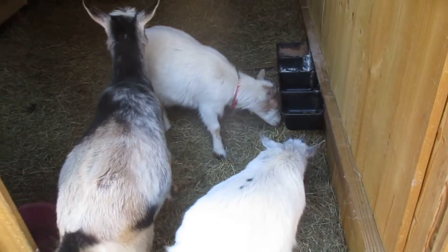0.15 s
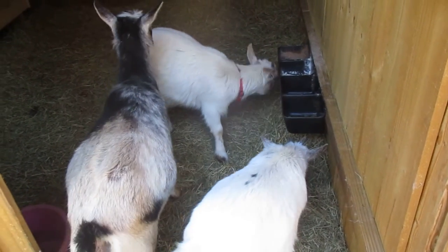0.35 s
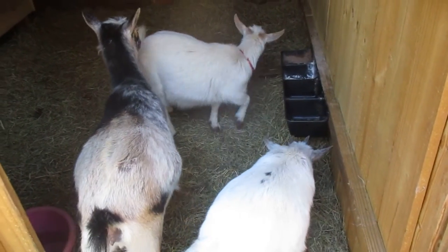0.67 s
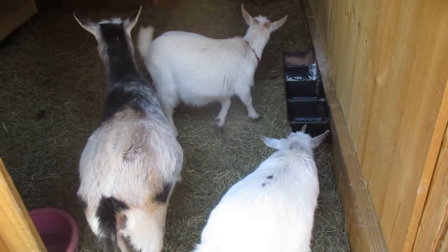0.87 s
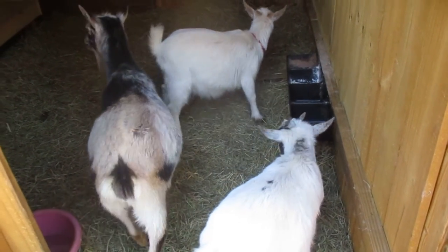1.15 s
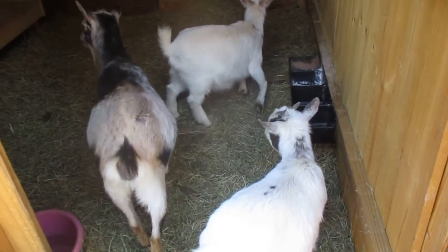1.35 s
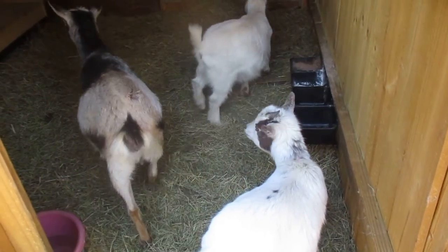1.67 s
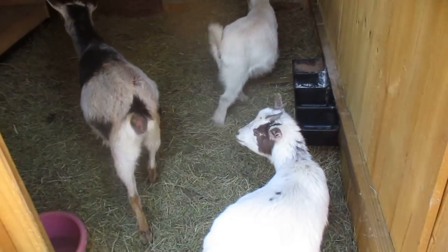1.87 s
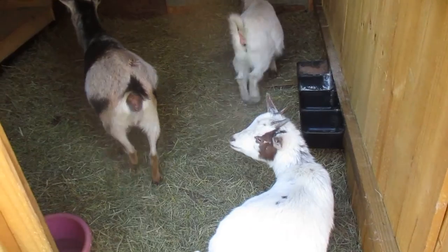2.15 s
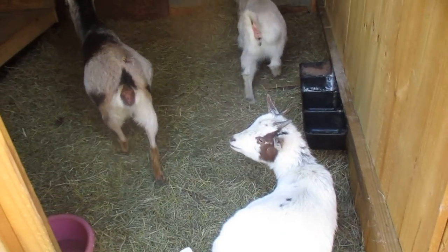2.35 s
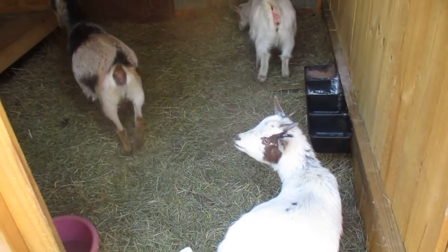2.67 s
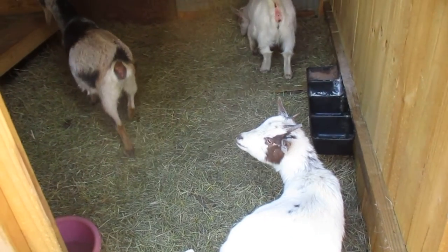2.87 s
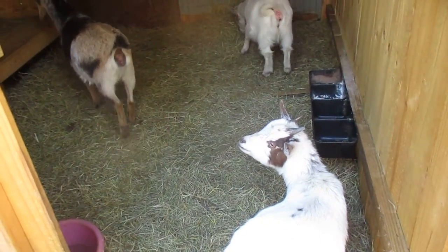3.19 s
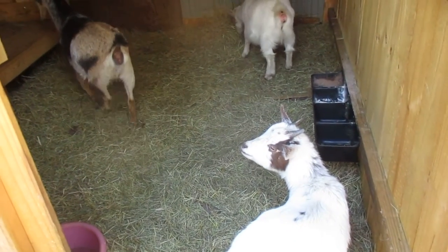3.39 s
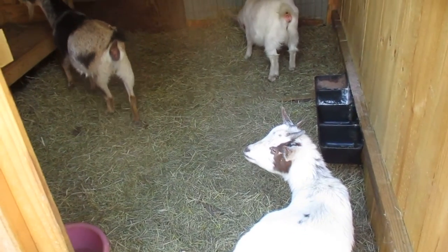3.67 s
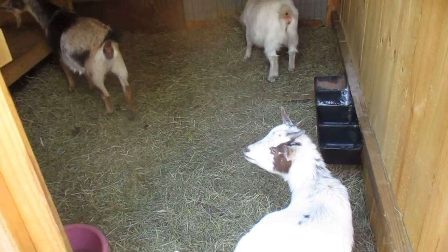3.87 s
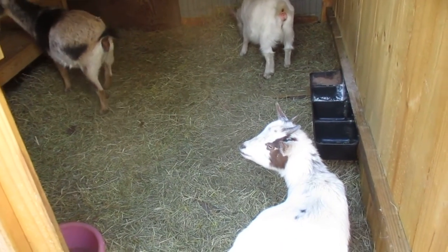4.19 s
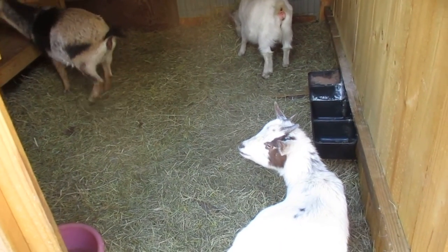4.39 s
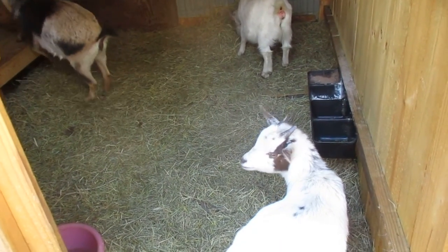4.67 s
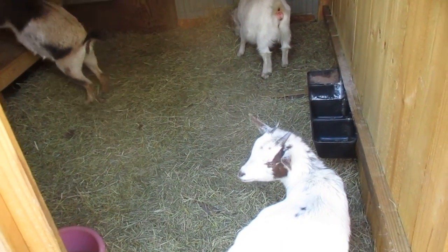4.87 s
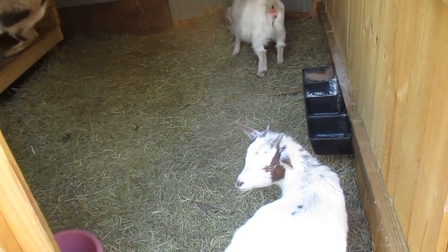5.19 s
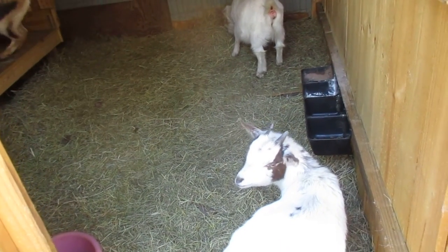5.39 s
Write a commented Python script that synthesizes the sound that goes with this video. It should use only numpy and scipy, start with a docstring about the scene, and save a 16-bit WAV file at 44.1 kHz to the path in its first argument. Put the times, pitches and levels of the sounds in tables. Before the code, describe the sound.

Inside a small wooden pen, a nearby goat gives a short throbbing bleat over rustling straw. Low air puffs bump the microphone, soft dull hoof thuds follow, and a fainter goat answers from further off. Near the end a loud sharp knock on boards starts a clattering cluster, with a hoarse crowing far away. Handheld camera sound, slightly ducking after loud hits.

```python
"""In a wooden pen a goat bleats close by in throbs, about ten a second; a fainter one answers from further off.
Throats are pulse trains and hiss in resonances; hooves are noise bursts and jolts ringing boards.
Straw rustles and snaps as noise grains, air puffs on the microphone, and a far hoarse crowing swells late.
Under it lie the barn's hush, a wavering band near 1 kHz, a faint whistle and the camera's thin whine.
The camera's gain control ducks after loud sounds and creeps back."""
import sys
import numpy as np
from scipy import signal
from scipy.fft import rfft, irfft, next_fast_len
from scipy.io import wavfile
from scipy.ndimage import uniform_filter1d, map_coordinates

SR = 44100
rng = np.random.default_rng(int(sys.argv[2]) if len(sys.argv) > 2 else 0)


def gain_from_db(level_db):
    """Turn a decibel level (scalar or array-like) into a linear amplitude factor."""
    decades = np.asarray(level_db, float) / 20
    return 10 ** decades


def unload_wav(signal):
    """Save mono or channel-first audio to the path in sys.argv[1] as 16-bit WAV at rate SR, clipped to [-1, 1]."""
    wavfile.write(
        sys.argv[1],
        SR,
        np.round(np.clip(np.atleast_2d(signal).T, -1, 1) * 32767).astype(np.int16),
    )


N = 244511
T = np.arange(N) / SR  # time of each sample [s]

# throbs of each voice: (time of peak [s], relative level [dB], pitch [Hz], length [s], mouth opening [0-1])
NEAR_THROBS = [(.645, -24, 316.2, 0.04, 0.33), (.75, -21, 455.4, 0.048, 0.73),
               (.84, -20.5, 517.2, 0.045, 0.84), (.931, -22.5, 538.3, .048, 0.89),
               (1.018, -23.5, 517, 0.044, 0.77), (1.111, -24.5, 515, .056, 0.71),
               (1.203, -32.5, 447.7, 0.046, 0.48), (1.268, -41.5, 385.2, 0.055, 0.82),
               (1.315, -42.5, 320, 0.032, 0.77)]
FAR_THROBS = [(3.335, -40, 435.6, 0.027, 0.041), (3.433, -39, 493, 0.018, .32),
              (3.531, -37, 519.7, 0.028, 0.58), (3.626, -40.5, 540, .035, .55),
              (3.712, -42.5, 557.6, .038, 0.53), (3.812, -44.5, 543, 0.092, 0.37)]
# throat resonances, each passed twice: (centre [Hz], width in one pass [Hz], level in one pass [dB])
NEAR_OPEN_MOUTH = [(477, 1080, -1.5), (890, 434, 4), (1622, 300, 3.5), (3150, 560, 1), (4650, 1100, -1.5)]
FAR_OPEN_MOUTH = [(517, 750, 3.2), (1000, 940, 3.5), (1580, 370, 5.2), (3570, 520, 4.8), (5100, 510, 5.5)]
SHUT_MOUTH = [(320, 152, 6.5), (926, 280, 3), (1500, 380, 2.5), (3160, 250, -9)]
CROWING_THROAT = [(694, 580, -2.5), (1184, 184, 1), (1464, 256, .5), (1990, 41, -5), (4900, 730, -12)]
# hooves on boards: (time [s], level of the first 30 ms of the plank sound [dB rms],
# boom over plank [dB], box over plank [dB], hardness [Hz])
KNOCKS = [(1.014, -47, 4, 7, 300), (2.293, -41.5, -2.5, -1.5, 1140), (2.467, -43, 15.5, 6, 490),
          (2.488, -50.5, 11.5, -1, 300), (2.577, -45, -19, -6, 794), (2.698, -56.5, 9.5, 9, 395),
          (2.717, -58, 8, 3, 350), (4.616, -49, -27, -16, 900), (4.652, -11, 0, -3, 2140),
          (4.682, -37, 15.5, 9.5, 2480), (4.983, -26, -2.5, -7, 3150), (5.038, -29, 0.5, -1, 1200),
          (5.057, -27.5, -4, 2, 1500), (5.068, -14, -2.5, 2.5, 2290), (5.227, -18.5, -3, 1.5, 2340),
          (5.246, -20.5, -10, 5.5, 1500), (5.299, -16, -2, 2, 1164)]
# what the boards ring with: (centre [Hz], width [Hz], level [dB])
BOOM_MODES = [(180.6, 19.4, 0)]
BOX_MODES = [(325, 40, 0), (470, 60, -2)]
PLANK_MODES = [(600, 120, -5), (720, 120, -5), (830, 100, -2), (920, 100, -1), (1060, 140, -5),
               (1290, 180, -8), (1520, 180, -9), (1850, 250, -13), (2320, 300, -13), (2650, 350, -14),
               (3600, 600, -17), (4500, 700, -19)]  # before the unevenness of each spot
# hooves shuffling in the bedding, before flutter: (time [s], level [dB])
SHUFFLE = [(0, -55), (.3, -77), (.65, -48.5), (.7, -54), (.93, -47), (1.1, -57.5), (1.43, -51.5),
           (1.6, -55.5), (2.2, -55), (2.45, -56.5), (2.6, -52), (3.3, -55.5), (3.5, -50.5), (3.8, -58.5),
           (4.0, -49), (4.33, -57.5), (4.49, -47.5), (4.65, -57), (5.54, -46)]
# footfalls in the straw: (time [s], level [dB], hold [s])
STEPS = [(.036, -43.5, 0.097), (.248, -57, .002), (.64, -52, 0.0073), (1.144, -46.5, 0.016),
         (1.584, -53, 0.035), (1.722, -42.5, 0.013), (1.79, -54, 0.04), (1.928, -65, .01),
         (2.006, -54.5, 0.053), (2.146, -53.5, 0.065), (2.27, -51.5, 0.033), (2.43, -61, .002),
         (2.47, -48.5, .02), (2.77, -49, .03), (2.81, -39, 0.0022), (3.03, -53, 0.051),
         (3.25, -53.5, 0.026), (3.385, -46, 0.062), (3.64, -45.5, 0.024), (4.015, -43, 0.023),
         (4.59, -47.5, 0.016), (4.988, -46, .004), (5.06, -44, 0.044), (5.238, -44, 0.0058),
         (5.4, -62, 0.036), (5.49, -56, .05)]
# colour of the rustle: (frequency [Hz], relative density [dB per Hz])
RUSTLE_COLOUR = [(880, -7), (1500, -7.5), (2200, -8), (2600, -2), (2950, -3), (3770, -3), (5270, -4),
                 (9310, -7), (15700, -15.5)]
# stalks snapping: (time [s], peak level [dB], centre [Hz])
SNAPS = [(0.034, -32, 2860), (0.0662, -24, 4450), (0.244, -42, 2790), (0.596, -31.5, 4180),
         (1.274, -38.5, 6200), (1.409, -33, 4090), (1.7158, -30, 3740), (1.726, -29, 3590),
         (1.8148, -40, 4730), (2.008, -31.5, 4220), (2.2648, -30, 5190), (2.4286, -39, 3080),
         (2.4717, -32, 5450), (2.646, -35, 2600), (2.76, -43, 2800), (2.812, -25.5, 6470),
         (3.08, -36.5, 2960), (3.3802, -30, 6100), (3.621, -36, 3190), (4.0163, -29, 2800),
         (4.1237, -31.5, 5170), (4.18, -38, 2550), (5.2051, -37, 2557), (5.413, -26.5, 4900),
         (5.4967, -26.5, 3800)]
# effort of the far crowing: (time [s], level of the rasp [dB], pitch before wavering [Hz])
CROWING = [(4.28, -69, 593), (4.349, -47.5, 590), (4.5, -43, 592), (4.6, -46, 611), (4.761, -36.5, 782),
           (4.84, -41.5, 757), (4.9, -37, 763), (4.941, -40, 883), (5.13, -25.5, 879), (5.201, -31.5, 820),
           (5.38, -33, 693), (5.54, -35, 664)]
# swells of the whistle on the crowing's octave, before flutter: (time [s], level [dB], hold [s])
CROWING_WHISTLES = [(4.9, -35, .005), (4.935, -30.5, .015), (5.165, -32, 0.012)]
# puffs of air on the microphone: (time [s], peak level [dB], rate [Hz], push 1 or pull -1)
PUFFS = [(0.249, -37, 70.4, 1), (0.266, -31, 60, 1), (1.403, -11, 146, 1), (1.436, -18, 98.6, 1),
         (1.45, -21, 107, -1), (1.471, -16.5, 94, 1), (1.495, -14, 129, 1), (1.629, -21, 138, 1),
         (1.671, -17, 168, 1), (2.161, -19.5, 110, 1), (2.18, -16, 109, 1), (2.218, -25, 109, 1),
         (2.251, -22, 116, 1), (2.395, -21.5, 68, -1), (2.426, -22.5, 103, -1), (2.498, -32, 80, -1)]
# gusts on the microphone: (time [s], level [dB], hold [s])
GUSTS = [(.2, -43.5, .07), (.72, -47, .12), (1.43, -25, 0.062), (1.6, -26.5, 0.014), (1.68, -28.5, 0.0061),
         (1.85, -43.5, 0.14), (2.04, -37.5, 0.008), (2.14, -28, 0.12), (2.4, -36, 0.024),
         (2.49, -28, 0.012), (2.9, -43, .07), (4.79, -42, 0.09), (5.17, -40, 0.026), (5.45, -42.5, 0.1)]
# colour of the buffeting: (frequency [Hz], relative density [dB per Hz])
BUFFET_COLOUR = [(12, -24), (20, 0), (82, 3), (140, -12), (285, -18), (353, -35), (400, -39), (520, -75),
                 (880, -120)]
# a low wavering tone: (time [s], pitch [Hz], level [dB rms])
LOW_TONE = [(.64, 69.4, -47), (.722, 72.4, -35.5), (.77, 85, -39), (.828, 85.4, -37), (.87, 92.4, -44),
            (1.1, 93.2, -43), (1.172, 78.2, -46), (1.4, 77, -40)]
# colour of the barn's hush: (frequency [Hz], relative density [dB per Hz])
HUSH_COLOUR = [(35, -39), (60, -16), (118, 4), (179, -12.5), (226, -7.5), (286, -9.5), (455, -12),
               (981, -13.5), (1080, -14), (1600, -24), (2730, -24.5), (3610, -33.5), (4250, -27.5),
               (11800, -36), (15700, -45)]
# a band of sound near 1 kHz, before flutter: (time [s], level [dB], hold [s])
BAND_SWELLS = [(0, -51, .03), (.2, -57.5, .3), (.7, -48.5, 0.24), (.98, -44, 0.059), (1.52, -51.5, 0.13),
               (1.9, -52.5, 0.24), (2.95, -52, 0.027), (3.39, -51.5, 0.36), (3.7, -56.5, 0.36),
               (4.39, -51.5, 0.08)]
# a faint nasal whistle near 2.7 kHz, before flutter: (time [s], level [dB], hold [s])
NASAL_WHISTLES = [(.07, -62, .08), (2.76, -63, .25)]
# how fast the walls' answer dies: (frequency [Hz], time to fall 60 dB [s])
WALL_DECAY = [(150, 0.22), (1000, 0.16), (4000, 0.18), (12000, 0.065)]


def bleat(throbs, throat, climb, sag, rough):
    """Vocal folds squeezed in throbs: each squeeze lifts level, pitch and brightness together."""
    s, db, hz, length, mouth = np.transpose(throbs)[:, :, None]
    rise_share = .7  # part of a throb spent rising
    rise, fall = rise_share * length, (1 - rise_share) * length
    first, last = round((s[0, 0] - .1) * SR), round((s[-1, 0] + .15) * SR)
    late = T[first:last] - s
    squeeze = np.abs(late / np.where(late < 0, rise, fall))  # 0 at the peak, growing as the folds slacken
    closed_db = 300 * np.maximum(-late / rise - 1.15, 0)  # the folds catch suddenly
    share = gain_from_db(db - np.where(late < 0, 4.5, 6) * squeeze ** 2.4 - closed_db) ** 2 + 1e-30

    def mix(values):
        """Average over the throbs, weighted by their power at each moment."""
        return (share * values).sum(0) / share.sum(0)

    slack = np.minimum(mix(squeeze), 2.5)
    pitch = mix(hz * (1 - np.where(late < 0, climb, sag) * np.minimum(squeeze, 2.5)))
    pitch *= 1 + .004 * (1 + 2 * slack) * wobble(170)[first:last]  # slack folds lose their beat
    phase = 2 * np.pi * np.cumsum(pitch) / SR
    k = np.arange(1, 20)[:, None]  # harmonic number
    pulses = -(gain_from_db(-.6 * k * slack) / k ** 0.94 * np.cos(k * phase)).sum(0)
    breath = (1 + np.cos(phase)) * rng.standard_normal(last - first)  # air hisses once a cycle
    folds = np.sqrt(share.sum(0)) * gain_from_db(wobble(200)[first:last]) * (pulses + rough * breath)
    # an open mouth rasps on between throbs
    leak = (mouth * gain_from_db(db - 18 - 4.9 * ((late - .025) / 0.037) ** 2)).sum(0)
    folds += leak * (breath + pulses * gain_from_db(4 * wobble(300)[first:last]))
    opening = np.clip(mix(mouth), 0, 1)
    out = np.zeros(N)
    out[first:last] = filtered(folds * opening, steep(throat))
    out[first:last] += filtered(folds * (1 - opening), steep(SHUT_MOUTH))
    return out


def hooves():
    """A hoof scrapes into contact; softer blows are duller; boom and box ring by where it lands."""
    contact_s, rattle_gain, rattle_t60_s = 0.0059, 0.091, 0.14
    out, t = np.zeros(N + SR), np.arange(SR // 3) / SR

    def early(x):
        """Scaled to the level of its first 30 ms."""
        return x / np.std(x[:SR // 33])

    for s, db, boom_db, box_db, hard_hz in KNOCKS:
        push = (t / contact_s) * np.exp(-(t / contact_s) ** 1.38)
        rattle = rattle_gain * gain_from_db(-60 * t / rattle_t60_s)  # loose boards shake on after the blow
        scrape = (push + rattle) * rng.standard_normal(len(t))
        tick = 0.33 * gain_from_db(-60 * t / 0.0074) * rng.standard_normal(len(t))  # the first touch
        force = scrape + tick
        # each spot wakes the modes unevenly
        spot = np.add(PLANK_MODES, [0, 0, 1.5] * rng.standard_normal((len(PLANK_MODES), 3)))
        plank = filtered(force, lambda f: resonant(spot)(f) / (1 + 1.4j * f / hard_hz - (f / hard_hz) ** 2))
        box = filtered(force, lambda f: resonant(BOX_MODES)(f) / (1 + 1j * f / 600))
        # the boom answers the weight, not the scrape; boards radiate no deep bass
        jolt = np.exp(-((t - .7 * contact_s) / .0012) ** 2)
        boom = filtered(jolt, lambda f: resonant(BOOM_MODES)(f) * (1j * f / (140 + 1j * f)) ** 3)
        knock = early(plank) + gain_from_db(box_db) * early(box) + gain_from_db(boom_db) * early(boom)
        out[round(s * SR):][:len(t)] += gain_from_db(db) * knock
    return out[:N]


def straw():
    """Dense dry grains under moving hooves, and single stalks that snap."""
    shuffle = gain_from_db(curve(SHUFFLE) + 0.72 * wobble(18))
    stir = np.hypot(shuffle, swells(STEPS, rise=1800, fall=630))
    out = stir * noise(RUSTLE_COLOUR, spiky_db=1.5, rate=570)
    t = np.arange(SR // 20) / SR
    for s, db, hz in SNAPS:
        fade = gain_from_db(-60 * t / 0.005) + 0.28 * gain_from_db(-60 * t / 0.078)  # a sharp crack with a weaker, longer tail
        crack = filtered(fade * rng.standard_normal(len(t)), resonant([(hz, 0.68 * hz, 0)]))
        piece = out[round(s * SR):][:len(t)]
        piece += (gain_from_db(db) * crack / np.abs(crack).max())[:len(piece)]
    return out


def hoarse_call():
    """A far rasp in throat resonances under an unsteady tone and its octave."""
    tone_db, octave_db = -5, -29  # relative to the rasp
    s, *columns = np.transpose(CROWING)
    effort_db, hz = (np.interp(T, s, c) for c in columns)
    rough_air = gain_from_db(1.5 * wobble(30)) * rng.standard_normal(N)
    rasp = gain_from_db(effort_db) * unit(filtered(rough_air, steep(CROWING_THROAT)))
    phase = 2 * np.pi * np.cumsum(hz * (1 + .028 * wobble(70))) / SR
    tone = gain_from_db(effort_db + tone_db + 4.5 * wobble(70)) * np.sin(phase)
    octave_gain = gain_from_db(effort_db + octave_db) + swells(CROWING_WHISTLES, rise=480, fall=560)
    octave = octave_gain * gain_from_db(3 * wobble(40)) * np.sin(2 * phase)
    return (T > s[0]) * (rasp + tone + octave)


def air():
    """Lumpy buffeting, a low wavering tone, and single pushes on the membrane that swing back on both sides."""
    still_db = -50.5
    gust_gain = np.hypot(gain_from_db(still_db), swells(GUSTS, rise=220, fall=244))
    out = gust_gain * noise(BUFFET_COLOUR, spiky_db=3.6, rate=31)
    s, hz, db = np.transpose(LOW_TONE)
    tone_gain = np.sqrt(2) * gain_from_db(np.interp(T, s, db, left=-120, right=-120))
    out += tone_gain * np.sin(2 * np.pi * np.cumsum(np.interp(T, s, hz)) / SR)
    for s, db, hz, way in PUFFS:
        u = (np.pi * hz * (T - s)) ** 2
        out += np.sign(way) * gain_from_db(db) * (1 - 2 * u) * np.exp(-u)
    return out


def barn():
    """Filtered noises: the barn's steady hush, a wavering band, a faint whistle and the camera's thin whine."""
    hush = gain_from_db(-45.5 + 0.14 * wobble(5.85)) * noise(HUSH_COLOUR)
    band = unit(filtered(rng.standard_normal(N), steep([(1060, 90, 0)])))
    drone = swells(BAND_SWELLS, rise=81, fall=81) * gain_from_db(2.56 * wobble(40)) * band
    nasal = unit(filtered(rng.standard_normal(N), steep([(2720, 300, 0)])))
    whistle = swells(NASAL_WHISTLES, rise=200, fall=29) * gain_from_db(2.5 * wobble(24.3)) * nasal
    whine = gain_from_db(-75) * unit(filtered(rng.standard_normal(N), resonant([(11793, 10, 0)])))
    return hush + drone + whistle + whine


def room(x):
    """Each frequency of the walls' answer dies at its own speed; the air makes it differ from moment to moment."""
    wet, step = np.zeros(N + SR), SR // 8  # a fresh answer every eighth of a second
    for i in range(0, N, step):
        hz, t, z = signal.stft(rng.standard_normal(SR // 2), SR, nperseg=256)
        fade = gain_from_db(-60 * t / along(WALL_DECAY, hz)[:, None])
        tail = signal.istft(z * fade, SR, nperseg=256)[1]
        answer = signal.fftconvolve(x[i:i + step], tail / np.linalg.norm(tail))
        wet[i + 300:][:len(answer)] += answer  # 7 ms behind the direct sound
    return wet[:N]


def unit(x):
    """Scaled to rms 1."""
    return x / np.sqrt(np.mean(x ** 2) + 1e-20)


def along(points, hz):
    """Values of (frequency, value) points, read on a log frequency axis."""
    f, v = np.transpose(points)
    return np.interp(np.log(hz + 1), np.log(f + 1), v)


def curve(rows):
    """Level in dB at each sample, silent before the first row."""
    s, db = np.transpose(rows)
    return np.interp(T, s, db, left=-120, right=db[-1])


def swells(rows, rise, fall):
    """Gain of overlapping (time, level, hold) events that rise and fall at set dB per second."""
    power = 0
    for s, db, hold in rows:
        before, after = np.maximum(s - T, 0), np.maximum(T - s - hold, 0)
        power = power + gain_from_db(db - rise * before - fall * after) ** 2
    return np.sqrt(power)


def wobble(rate):
    """A smooth random curve of rms 1, rate knots a second."""
    return unit(map_coordinates(rng.standard_normal(int(N * rate / SR) + 4), [T * rate]))


def noise(spectrum, spiky_db=0, rate=500):
    """Coloured noise of rms 1, broken into grains."""
    grains = gain_from_db(spiky_db * wobble(rate)) * rng.standard_normal(N)
    return unit(filtered(grains, lambda hz: gain_from_db(along(spectrum, hz))))


def filtered(x, response):
    """x filtered by a complex response of frequency."""
    m = next_fast_len(len(x) + 8192)
    return irfft(rfft(x, m) * response(np.fft.rfftfreq(m, 1 / SR)), m)[:len(x)]


def resonant(modes):
    """Causal response of (centre, width, level) resonances, with alternating signs."""
    def response(f):
        total = 0
        for k, (c, w, db) in enumerate(modes):
            total = total + (-1) ** k * gain_from_db(db) * 1j * f * w / (c * c - f * f + 1j * f * w)
        return total
    return response


def steep(modes):
    """The same resonances passed twice: valleys twice as deep in dB."""
    return lambda f: resonant(modes)(f) ** 2


def scene():
    """Voices and knocks with the answer of the walls, over straw, far crowing, air and barn."""
    near = bleat(NEAR_THROBS, NEAR_OPEN_MOUTH, climb=.11, sag=.055, rough=.13)
    far = bleat(FAR_THROBS, FAR_OPEN_MOUTH, climb=.02, sag=0.013, rough=0.052)
    knocks = hooves()
    wet = room(gain_from_db(-12.5) * near + gain_from_db(-7) * far + gain_from_db(-5.5) * knocks)
    return (near + far + knocks + wet + hoarse_call() + straw() + air() + barn())[None]


def top_cut(x):
    """Nothing passes above the cut-off."""
    return signal.sosfilt(signal.butter(12, 15820, fs=SR, output="sos"), x)


def record(dry):
    """Gain control drops just after loud peaks and creeps back; peaks past full scale clip."""
    threshold_db, creep_db_per_s, lag = -18.0, 16, round(0.02 * SR)
    loudness_db = 10 * np.log10(np.abs(uniform_filter1d(dry[0] ** 2, SR // 40)) + 1e-12)
    over_db = np.maximum(loudness_db - threshold_db, 0)
    creep_db = creep_db_per_s * T
    cut_db = np.maximum.accumulate(over_db + creep_db) - creep_db  # jumps up, falls back steadily
    cut_db = uniform_filter1d(np.pad(cut_db, (lag, 0))[:N], 2 * lag)
    mix = np.clip(dry * gain_from_db(-cut_db), -1, 1)
    return top_cut(mix)


dry = scene()
out = record(dry)
unload_wav(out)
```